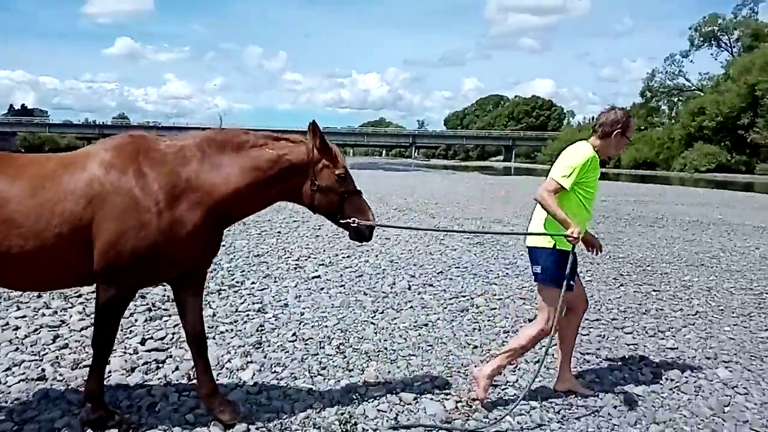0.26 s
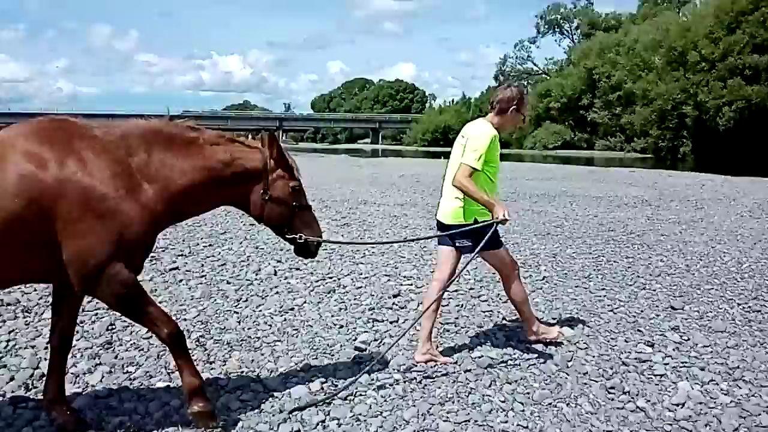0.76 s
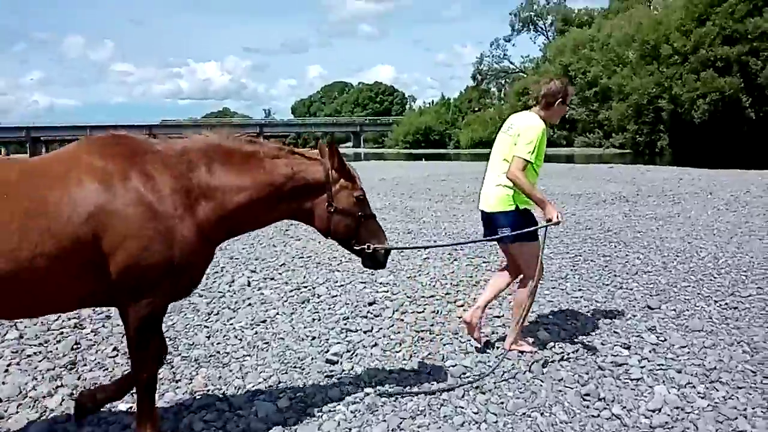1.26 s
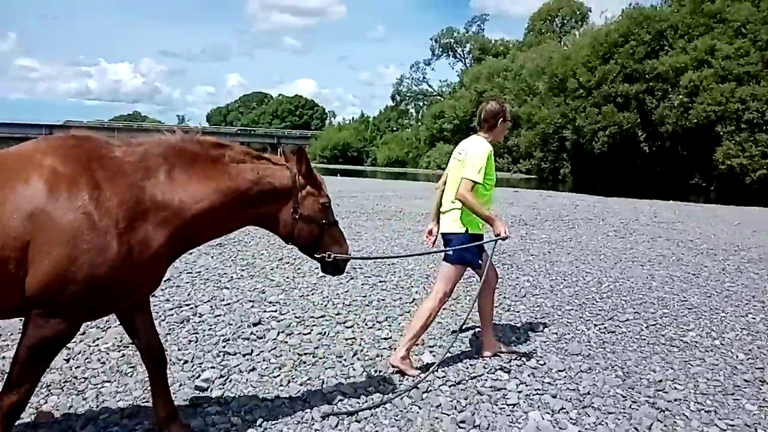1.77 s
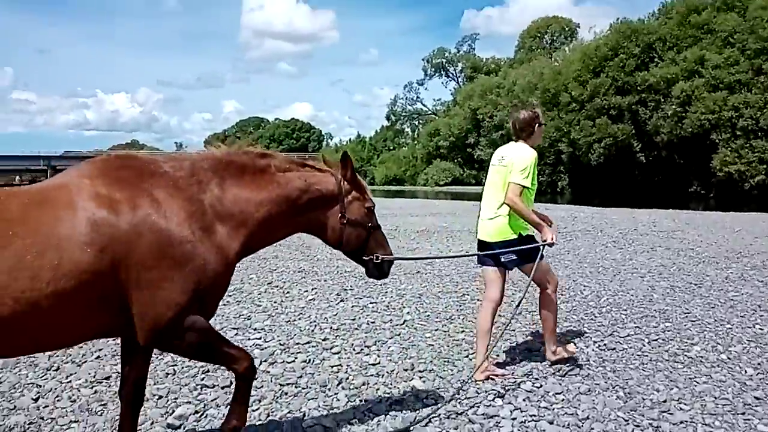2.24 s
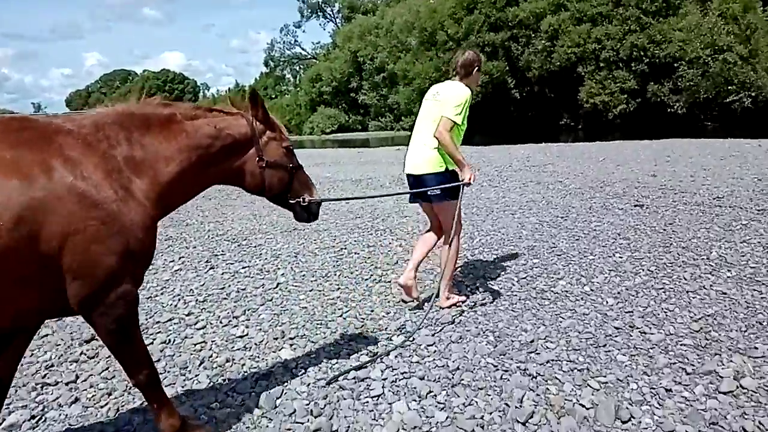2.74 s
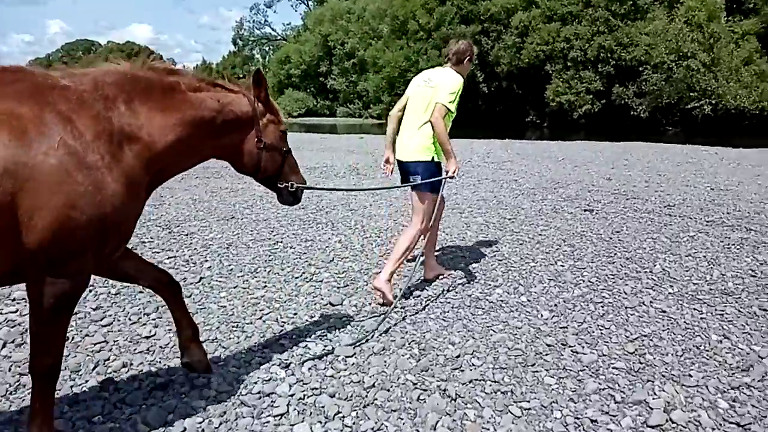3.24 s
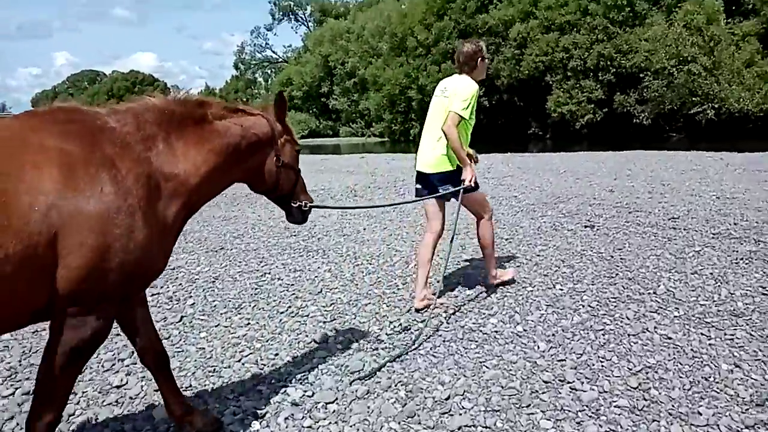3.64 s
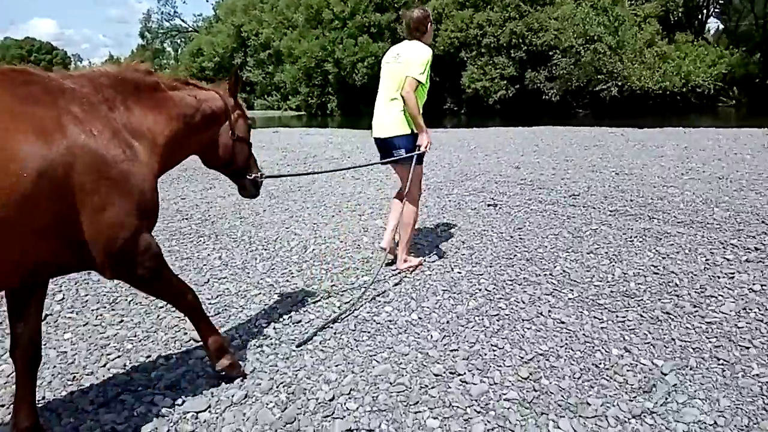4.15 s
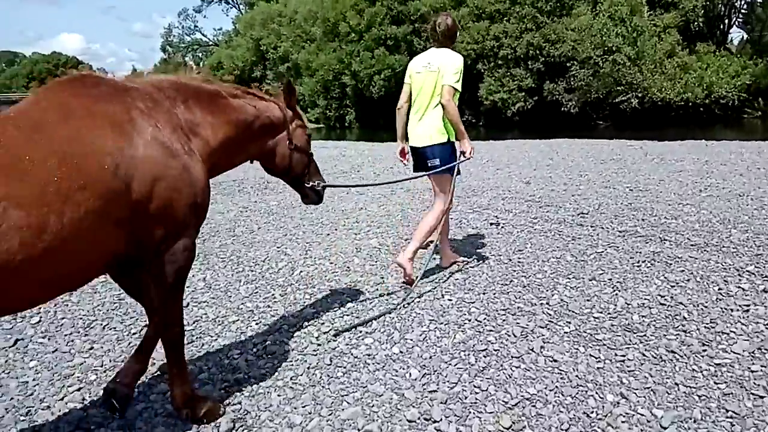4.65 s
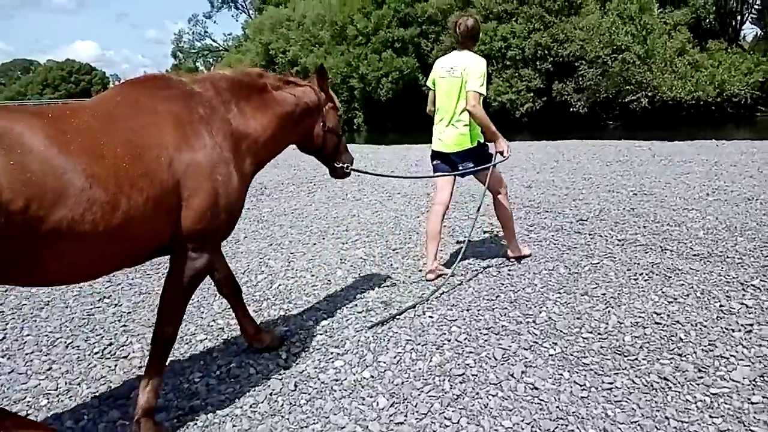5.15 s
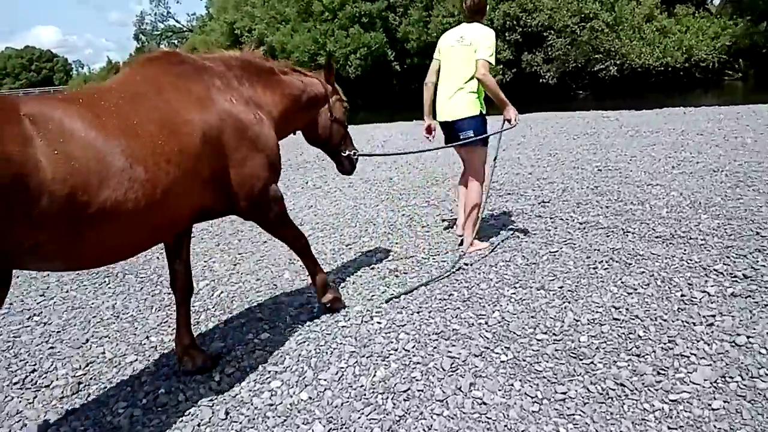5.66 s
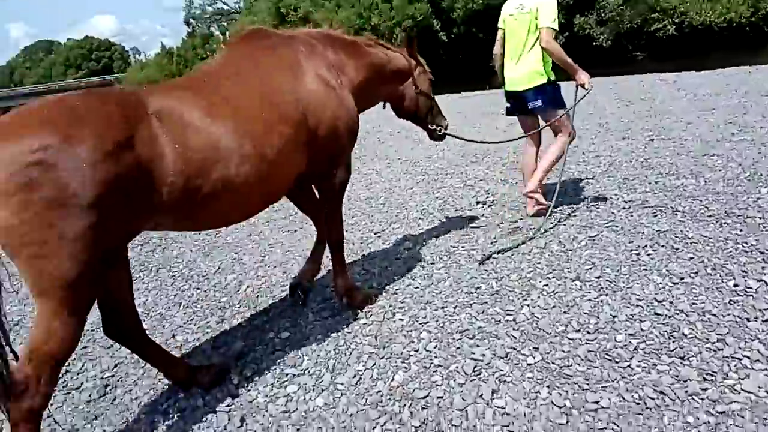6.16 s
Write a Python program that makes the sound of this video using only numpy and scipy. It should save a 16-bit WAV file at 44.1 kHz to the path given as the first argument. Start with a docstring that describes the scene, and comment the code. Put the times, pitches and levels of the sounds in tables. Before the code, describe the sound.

Hooves and bare feet crunch and clack over loose river stones close by, with dull thuds, a faint engine drone and soft distant rush.

```python
"""Stones knock and crunch at once, close by: a horse and a barefoot walker cross a dry bed of river stones.
Knocks and crunches are many short damped rings, and dull low swings make the thuds of landing weight.
Behind them a far engine drones as wavering sine tones, and filtered noise makes a soft far rush.
A light wind pops, mostly on the left port of a hand-held phone; its two ports differ in colour and distance."""
import sys
import numpy as np
from scipy import signal
from scipy.fft import rfft, irfft, next_fast_len
from scipy.io import wavfile
from scipy.ndimage import map_coordinates

SR = 44100
rng = np.random.default_rng(int(sys.argv[2]) if len(sys.argv) > 2 else 0)


def store_wav(level_fs):
    """Save 16-bit WAV to argv[1]."""
    pcm = np.round(np.clip(np.atleast_2d(level_fs), -1, 1) * 32767)
    wavfile.write(sys.argv[1], SR, pcm.T.astype(np.int16))


N = 282240  # samples, 6.4 s


def amp(db):
    """Turn decibels into a gain."""
    return 10 ** (np.asarray(db) / 20)


def unit(x):
    """Scale a sound to an rms of 1."""
    return x / np.sqrt(np.mean(x ** 2) + 1e-20)


def along(points, hz):
    """Read a curve of (Hz, value) points, with straight lines on a log frequency axis."""
    point_hz, value = np.transpose(points)
    return np.interp(np.log(hz + 1), np.log(point_hz + 1), value)


def curves(rows):
    """Give one value per sample for each column after the time."""
    s, *columns = np.transpose(rows)
    return [np.interp(np.arange(N) / SR, s, column) for column in columns]


def wobble(knots_per_s):
    """Draw a smooth random curve through random knots."""
    knots = rng.standard_normal(int(N * knots_per_s / SR) + 4)
    return map_coordinates(knots, [np.arange(N) * knots_per_s / SR])


def filtered(x, response):
    """Multiply the spectrum of a sound by a response that depends on frequency."""
    size = next_fast_len(N + SR // 4)
    spectrum = rfft(x, size) * response(np.fft.rfftfreq(size, 1 / SR))
    return irfft(spectrum, size)[..., :N]


# How much sooner a step reaches the left port, by where it falls: start_s [s], lead_ms [ms]
LEFT_LEAD = [(0, 0.6), (.08, 0.85), (.2, 0.87), (.4, 0.73), (.65, 0.7), (.88, 0.79), (1, 0.73), (1.3, 0.74),
             (1.59, 0.78), (1.83, 0.67), (2.14, 0.71), (2.5, 0.83), (2.75, 0.7), (3, 0.63), (3.06, 0.78),
             (3.65, 0.74), (3.7, 0.77), (3.95, 0.58), (4.18, 0.82), (4.48, 0.68), (4.55, .82), (4.7, 0.6),
             (4.97, 0.88), (5.13, 0.78), (5.4, 0.65), (5.71, 0.85), (6.16, 0.72), (6.4, 0.78)]


def contacts(s, gain, hz, spread, cycles, scatter_s, size):
    """Ring each contact as a short damped sine; each lies elsewhere, so its lead between the ports differs."""
    draw = rng.standard_normal((len(s), 3))
    pitch = np.clip(hz * np.exp(spread * draw[:, 0]), 90, 17000)[:, None]
    lead_s = np.interp(s, *np.transpose(LEFT_LEAD)) / 1000 + scatter_s * draw[:, 1]
    signed_gain = (gain * np.sign(draw[:, 2]))[:, None]
    # each ring fades smoothly to nothing by the end of its window
    rest = np.cos(np.arange(size) / size * np.pi / 2)
    out = np.zeros((2, N))
    for side, start_s in enumerate((s - lead_s / 2, s + lead_s / 2)):
        at = np.ceil(start_s * SR)[:, None] + np.arange(size)
        turns = (at / SR - start_s[:, None]) * pitch
        rise = 1 - np.exp(-turns / 0.33)  # rounded stones press in over part of a cycle
        decay = np.exp(-turns / cycles)
        ring = signed_gain * np.sin(2 * np.pi * turns) * decay * rise * rest
        # samples past the end collect in a spare last place; those before the start pile onto the first sample
        place = np.clip(at, 0, N).astype(int)
        out[side] = np.bincount(place.ravel(), ring.ravel(), N + 1)[:N]
    return out


# A foot or hoof presses the pebbles, short crunches over longer rolls:
# start_s [s], length_s [s], small_level_db (small pebbles) [dB], big_level_db (big stones) [dB]
CRUNCH_TABLE = [(0, 0.025, -32.5, -50), (0.024, 0.076, -47, -50), (0.065, 0.064, -44, -34),
                (0.133, 0.44, -52.5, -49.5), (0.188, 0.046, -59, -39), (0.343, 0.062, -50, -46.5),
                (0.454, 0.008, -44, -50), (0.543, 0.073, -45, -48), (0.577, 0.031, -42.5, -35.5),
                (0.611, 0.13, -53.5, -50), (0.666, 0.048, -46.5, -42.5), (0.725, 0.067, -60, -58),
                (0.823, 0.23, -54, -50.5), (0.872, 0.016, -37, -35.5), (0.966, 0.18, -43.5, -40),
                (1.138, 0.26, -49, -47.5), (1.209, 0.06, -42.5, -59), (1.273, 0.025, -38.5, -45),
                (1.293, 0.026, -40.5, -39), (1.417, 0.2, -57.5, -55.5), (1.576, 0.039, -40.5, -44),
                (1.626, 0.098, -53, -49.5), (1.738, 0.2, -54.5, -47), (1.816, 0.039, -44.5, -42),
                (1.978, 0.047, -52, -43.5), (2.033, 0.014, -34, -34.5), (2.054, 0.042, -48.5, -45),
                (2.131, 0.018, -46, -41.5), (2.149, 0.052, -54.5, -53), (2.353, 0.023, -50.5, -44.5),
                (2.49, 0.011, -46, -39.5), (2.591, 0.023, -47.5, -45.5), (2.689, 0.17, -57.5, -52.5),
                (2.775, 0.016, -45, -33), (2.872, 0.16, -42.5, -40.5), (2.96, 0.074, -47.5, -48),
                (3.04, 0.1, -54, -52), (3.058, 0.018, -36.5, -35.5), (3.123, 0.013, -41, -41.5),
                (3.149, 0.045, -49.5, -67), (3.366, 0.013, -36, -31.5), (3.394, 0.14, -60.5, -54.5),
                (3.587, 0.22, -45, -44.5), (3.6, 0.025, -42, -40), (3.627, 0.086, -36, -34),
                (3.735, 0.02, -57, -43), (3.796, 0.12, -54.5, -52.5), (3.92, 0.1, -47.5, -46.5),
                (4.07, 0.015, -37, -43.5), (4.09, 0.071, -54, -54), (4.108, .02, -44.5, -60),
                (4.171, 0.021, -33, -33.5), (4.196, 0.025, -44, -52), (4.221, 0.048, -49.5, -54),
                (4.276, 0.19, -47.5, -44), (4.471, 0.023, -37, -33), (4.509, 0.33, -50.5, -51),
                (4.526, 0.049, -35, -33), (4.594, 0.011, -46, -48), (4.646, 0.12, -54.5, -46.5),
                (4.959, 0.023, -43, -45), (4.987, 0.31, -57, -50.5), (5.022, 0.072, -43.5, -45),
                (5.108, 0.046, -42.5, -36), (5.162, 0.17, -46.5, -49), (5.346, 0.11, -48.5, -45.5),
                (5.457, 0.12, -61, -59), (5.69, 0.053, -41.5, -45), (5.726, 0.59, -51.5, -51.5),
                (5.825, 0.056, -46, -43), (5.919, 0.027, -41.5, -41.5), (6.009, 0.036, -46, -55),
                (6.093, 0.02, -49.5, -42.5), (6.153, 0.061, -49.5, -46), (6.271, 0.12, -61, -65.5)]
PRESS_S, LIFT_S = 0.0012, 0.022  # rise in power; time to fall 60 dB after the load
SAG_DB = 2  # loss while the load lasts
SWELL_DB, SWELL_S = 0.5, 0.014  # a crunch starts this much softer and swells in this time


def load():
    """Press, sag and let go for each crunch, adding in power; gives the gains of small and big stones."""
    t = np.arange(N) / SR
    power = np.zeros((2, N))
    for s, length, *level_db in CRUNCH_TABLE:
        first = np.searchsorted(t, s)
        age = t[first:][:int((length + LIFT_S) * SR)] - s
        swell_db = -SWELL_DB * np.maximum(1 - age / SWELL_S, 0)
        sag_db = -SAG_DB * np.minimum(age / length, 1) ** 2
        lift_db = -60 * np.maximum(age - length, 0) / LIFT_S
        gain = amp(np.add.outer(level_db, swell_db + sag_db + lift_db))
        press = np.minimum(age / PRESS_S, 1)
        power[:, first:first + len(age)] += gain ** 2 * press
    return np.sqrt(power)


def stream(per_s, spiky_db, lumpy_db, hz, **stone):
    """Rain contacts at random, with levels that wander in clumps, scaled to rms 1."""
    draw = rng.random((int(per_s * N / SR), 2))
    at = (draw[:, 0] * N).astype(int)
    clumps_db = lumpy_db * (wobble(60) + 0.2 * wobble(170))
    spikes_db = np.minimum(-spiky_db * np.log(1 - draw[:, 1]), 16)
    gain = amp(spikes_db + clumps_db[at])
    return unit(contacts(draw[:, 0] * N / SR, gain, hz[at], **stone))


# How the stone bed changes along the way:
# start_s [s], small_pitch_hz [Hz], big_pitch_hz [Hz], rumble_db (relative to the load on big stones) [dB]
BED_TABLE = [(0, 6000, 1565, -20), (.7, 5000, 1410, -16), (1.1, 4580, 1430, -22), (1.5, 4500, 1290, -11),
             (2, 5270, 1344, -16), (2.6, 5880, 1270, -6), (3.2, 5950, 1320, -21), (3.65, 5460, 1195, -5.5),
             (4.1, 6500, 1500, -8), (4.5, 5730, 1356, -9), (5.2, 5840, 1207, -5.5), (6.4, 6400, 1190, -3.5)]
SMALL_DRIFT, BIG_DRIFT = 0.17, 0.1  # pebble pitches drift as the load meets other stones (log pitch)
SETTLE_SMALL_DB, SETTLE_BIG_DB, SETTLE_BED_DB = -65.5, -60.5, -59.5  # settling between the steps
STRAY_DB = -68  # single pebbles tipping over at random


def grind():
    """Roll and settle pebbles while a foot or hoof loads them; the bed rumbles under the weight."""
    on_small, on_big = load()
    small_hz, big_hz, rumble_db = curves(BED_TABLE)
    small_hz = small_hz * np.exp(SMALL_DRIFT * wobble(15))
    big_hz = big_hz * np.exp(BIG_DRIFT * wobble(15))
    middle_hz = np.sqrt(small_hz * big_hz)

    small = stream(3500, spiky_db=1.0, lumpy_db=2, hz=small_hz,
                   spread=0.46, cycles=1.07, scatter_s=.000045, size=52)
    big = stream(1600, spiky_db=2.0, lumpy_db=2.5, hz=big_hz,
                 spread=0.4785, cycles=6.2, scatter_s=0.000085, size=300)
    # a few loose stones of middle size ring on for several cycles
    loose = stream(260, spiky_db=7.0, lumpy_db=2.0, hz=middle_hz,
                   spread=0.51, cycles=34, scatter_s=.00006, size=340)
    bed = stream(300, spiky_db=2.0, lumpy_db=-1.0, hz=np.full(N, 215.),
                 spread=0.46, cycles=2.4, scatter_s=0.0001, size=800)
    stray = stream(45, spiky_db=-0.5, lumpy_db=-4.5, hz=small_hz,
                   spread=0.305, cycles=5.3, scatter_s=.00006, size=120)

    # load and settling add in power
    small_gain = np.hypot(on_small, amp(SETTLE_SMALL_DB))
    big_gain = np.hypot(on_big, amp(SETTLE_BIG_DB))
    bed_gain = np.hypot(amp(rumble_db) * on_big, amp(SETTLE_BED_DB))
    pebbles = small_gain * (small + amp(-7.0) * loose)
    return amp(STRAY_DB) * stray + pebbles + big_gain * big + bed_gain * bed


# Tone of the rush of river and distance: pitch_hz [Hz], level_db (relative, per Hz) [dB]
AIR_TONE = [(15, -50), (25, 20.5), (97, -2), (293, -18), (476, -5.5), (1020, -3), (3250, -10), (9070, -28),
            (12500, -52), (14800, -41), (16000, -33)]
AIR_DB = -56  # middle of a slightly wandering level


def air():
    """Filter noise into a diffuse far rush, alike at both ports only in the bass."""
    common, left, right = rng.standard_normal((3, N))

    def alike(hz):
        """Give the share of power common to both ports, falling as waves get shorter."""
        return 1 / (1 + (hz / 350) ** 2)

    shared = filtered(common, lambda hz: amp(along(AIR_TONE, hz)) * np.sqrt(alike(hz)))
    own = filtered(np.array([left, right]), lambda hz: amp(along(AIR_TONE, hz)) * np.sqrt(1 - alike(hz)))
    return amp(AIR_DB + 0.33 * wobble(2.96)) * unit(shared + own)


# Far engine, nearing: start_s [s], pitch_hz (firing rate before wavering) [Hz], level_db (before a lift) [dB]
ENGINE_TABLE = [(0, 92.3, -82), (.7, 93.1, -70), (1.5, 95.4, -64), (2.2, 97.2, -71), (2.7, 98.2, -68),
                (3.2, 98.8, -65), (3.9, 99.4, -65), (4.3, 100.1, -61.5), (5, 100.7, -58.5),
                (6.4, 102.9, -59.5)]
# Engine tones: multiple (of the firing rate) [times], level_db (before wavering) [dB]
EXHAUST_TONES = [(1, 2), (2, -2), (3, -17)]


def engine():
    """Add sine tones at multiples of the firing rate, wavering over the distance."""
    hz, level_db = curves(ENGINE_TABLE)
    phase = 2 * np.pi * np.cumsum(hz * (1 + 0.00397 * wobble(6))) / SR
    tones = sum(amp(tone_db + 1.5 * wobble(15)) * np.sin(multiple * phase)
                for multiple, tone_db in EXHAUST_TONES)
    return amp(level_db + 4) * tones


def burst(rows, t60, boost_db, per_s, loose_db, count):
    """Turn each blow into a first hit and a dying rattle; gives times, gains and pitches of the contacts."""
    s, level_db, hz = np.transpose(rows)[..., None]
    draw = rng.exponential(size=(len(rows), 2, count))
    after_s = (np.cumsum(draw[:, 0], axis=1) - draw[:, 0, :1]) / per_s
    fade_db = -60 * after_s / t60
    weaker_db = -loose_db * draw[:, 1] * (after_s > 0)  # the first hit keeps its full level
    gain = amp(level_db + boost_db + fade_db + weaker_db)
    return (s + after_s).ravel(), gain.ravel(), np.repeat(hz, count)


# Small stones clacking: start_s [s], level_db (before each layer's trim) [dB], pitch_hz (centre) [Hz]
SMALL_KNOCKS = [(0.0104, -18, 6600), (0.021, -24, 6000), (0.073, -20, 3120), (0.0765, -21.5, 5800),
                (0.189, -36, 3340), (0.201, -27, 5660), (0.2235, -28, 3380), (0.2483, -37, 4870),
                (0.2688, -25, 7900), (0.2937, -29, 3330), (0.3461, -39, 5600), (0.4, -37, 5520),
                (0.453, -33.5, 9160), (0.5382, -26.5, 7380), (0.5926, -25, 6200), (0.6439, -44, 6990),
                (0.6976, -29.5, 5100), (0.7328, -36, 8850), (0.8494, -34, 6200), (0.8724, -14, 4900),
                (0.9493, -34, 3000), (0.9746, -32, 2960), (1.0995, -27.5, 2900), (1.1712, -32, 5350),
                (1.1954, -25.5, 5040), (1.2196, -26, 2980), (1.232, -32, 2630), (1.24, -39, 8900),
                (1.276, -28, 2920), (1.29, -19.5, 2980), (1.3663, -29, 3140), (1.395, -38, 6800),
                (1.494, -38, 4500), (1.5853, -24.5, 3480), (1.594, -22, 4600), (1.6591, -36, 2700),
                (1.7469, -33.5, 5600), (1.7873, -36, 4740), (1.8254, -31, 4600), (1.853, -36, 4500),
                (1.8861, -34, 5160), (1.914, -32.5, 4770), (1.9535, -40, 7500), (1.9814, -30, 3100),
                (2.0369, -24, 4680), (2.0737, -31, 3750), (2.132, -25.5, 4800), (2.161, -39, 4660),
                (2.2458, -32, 9400), (2.2722, -40, 8000), (2.284, -38, 7500), (2.4345, -40, 5020),
                (2.4966, -21.5, 4670), (2.497, -23.5, 8500), (2.5521, -38.5, 6920), (2.5825, -40, 4800),
                (2.6, -33, 4740), (2.7112, -35, 4760), (2.7606, -36, 8800), (2.7852, -25, 4900),
                (2.839, -30, 3450), (2.8724, -24, 6130), (2.9083, -41, 5250), (2.9607, -25.5, 5740),
                (2.992, -27, 4920), (3.0582, -25, 4860), (3.129, -24.5, 5900), (3.1672, -40, 9300),
                (3.2705, -37.5, 8700), (3.3655, -27.5, 9500), (3.376, -31, 5200), (3.4048, -26.5, 5360),
                (3.4615, -35, 4900), (3.4865, -42, 6070), (3.5698, -43, 5430), (3.5942, -35, 3880),
                (3.6137, -36, 9360), (3.6348, -26, 5250), (3.6496, -19, 5900), (3.67, -20.5, 6470),
                (3.692, -14.5, 4630), (3.696, -20.5, 6420), (3.722, -30, 8000), (3.7435, -28.5, 2800),
                (3.8871, -40, 4070), (3.9255, -36, 9200), (4.0702, -17.5, 9330), (4.0706, -17.5, 5080),
                (4.0748, -19, 9200), (4.0795, -23, 4900), (4.088, -32, 9000), (4.113, -31, 9000),
                (4.1175, -30, 9100), (4.124, -33, 9100), (4.1728, -18, 8300), (4.182, -35, 9400),
                (4.193, -27, 5000), (4.2926, -41, 9300), (4.3595, -31.5, 4070), (4.4166, -30.5, 6600),
                (4.476, -22, 5070), (4.481, -17.5, 5140), (4.5301, -35, 9400), (4.54, -20.5, 4810),
                (4.551, -22.5, 5070), (4.597, -27.5, 6200), (4.6249, -42, 6540), (4.6563, -31, 5700),
                (4.669, -23.5, 5500), (4.7087, -42, 6440), (4.739, -30, 5000), (4.746, -30, 5000),
                (4.7965, -40, 9750), (4.9591, -26, 4580), (4.975, -34, 6000), (5.031, -28.5, 6150),
                (5.083, -31, 2880), (5.1138, -24.5, 2760), (5.135, -24, 8860), (5.144, -22.5, 8940),
                (5.184, -34, 5050), (5.216, -31, 5000), (5.226, -33, 6990), (5.2457, -26.5, 7160),
                (5.305, -34, 5200), (5.3528, -31.5, 6900), (5.37, -35, 5030), (5.4236, -29.5, 4700),
                (5.443, -30, 7400), (5.4959, -40, 9340), (5.5098, -32.5, 6840), (5.6901, -23.5, 5120),
                (5.729, -24, 7430), (5.764, -30.5, 4700), (5.855, -31, 4400), (5.9194, -35, 2800),
                (5.9808, -35, 4860), (5.9893, -41, 5160), (6.005, -29.5, 6800), (6.023, -32, 9000),
                (6.147, -24.5, 5540), (6.15, -19.5, 5380), (6.1545, -21.5, 5300), (6.166, -24, 5200),
                (6.172, -25, 5000), (6.25, -42, 9000), (6.314, -33, 7560), (6.32, -30.5, 8600),
                (6.3517, -27.5, 5630), (6.3595, -27.5, 9800), (6.369, -38, 5000), (6.379, -43, 9500)]
# Big stones knocking: start_s [s], level_db (before a trim) [dB], pitch_hz (centre) [Hz]
BIG_KNOCKS = [(0.073, -19.5, 2270), (0.108, -31, 980), (0.189, -27, 1550), (0.496, -32, 1460),
              (0.582, -27.5, 1380), (0.666, -30, 1930), (0.854, -26.5, 2260), (0.973, -24.5, 2530),
              (0.98, -34, 1310), (1.01, -37, 1000), (1.035, -37, 1500), (1.064, -28, 1400),
              (1.082, -32, 1100), (1.104, -32, 1210), (1.194, -30, 916), (1.225, -38, 1000),
              (1.294, -28, 1800), (1.593, -26, 896), (1.831, -24, 884), (1.833, -28.5, 1830),
              (1.912, -31, 1900), (1.981, -35, 1820), (2.038, -28.5, 1150), (2.134, -22, 1720),
              (2.488, -31, 994), (2.498, -34, 706), (2.44, -39, 1707), (2.518, -44, 1100),
              (2.535, -41, 1500), (2.642, -38, 1810), (2.702, -31.5, 1820), (2.777, -25.5, 1167),
              (2.839, -30.5, 1840), (2.887, -36, 1680), (2.909, -20.5, 1120), (2.935, -33, 1300),
              (2.962, -28.5, 1670), (2.967, -23.5, 1105), (2.995, -31.5, 1400), (3.059, -22, 788),
              (3.066, -28, 1480), (3.126, -36, 970), (3.13, -28.5, 2060), (3.365, -26, 1340),
              (3.375, -29, 1210), (3.405, -36, 980), (3.421, -32.5, 1370), (3.46, -33.5, 1390),
              (3.592, -32.5, 930), (3.633, -26, 830), (3.658, -37, 1410), (3.672, -31, 1000),
              (3.69, -25, 1460), (3.7, -27, 740), (3.727, -30, 1610), (3.779, -30, 2030),
              (4.0795, -25.5, 2100), (4.177, -23, 1480), (4.177, -28, 800), (4.348, -33, 1440),
              (4.476, -24, 2250), (4.541, -24, 820), (4.556, -25, 960), (4.565, -22, 1200),
              (4.596, -33.5, 1040), (4.708, -34, 1630), (4.827, -29, 1560), (4.957, -29, 1044),
              (5.023, -32.5, 980), (5.055, -35, 1190), (5.11, -21.5, 1620), (5.12, -24, 1300),
              (5.145, -31, 1410), (5.185, -33.5, 1300), (5.282, -30, 2120), (5.083, -38, 1000),
              (5.355, -35.5, 1090), (5.783, -37, 950), (5.854, -29, 967), (5.866, -32, 1190),
              (5.93, -35, 1000), (6.097, -37, 1380), (6.106, -35, 800), (6.147, -31.5, 865),
              (6.168, -33, 1410)]
CLACK_DIES_S, CLUNK_DIES_S = 0.027, 0.019  # a rattle falls 60 dB in this time


def knocks():
    """Clack small stones over a wide range and ring them near their own pitch; big ones ring lower."""
    clack_hits = burst(SMALL_KNOCKS, CLACK_DIES_S, 0.44, 4000, 4.4, count=36)
    clack = contacts(*clack_hits, spread=0.4, cycles=1.55, scatter_s=.000045, size=48)
    chime_hits = burst(SMALL_KNOCKS, CLACK_DIES_S, -7.5, 493.0, 3.8, count=5)
    chime = contacts(*chime_hits, spread=0.023, cycles=13.3, scatter_s=.00004, size=260)
    clunk_hits = burst(BIG_KNOCKS, CLUNK_DIES_S, 0.68, 457.0, 1.5, count=8)
    clunk = contacts(*clunk_hits, spread=0.091, cycles=3.93, scatter_s=.00005, size=500)
    return clack + chime + clunk


def ground(x):
    """Scatter every contact off the rough bed into a brief noise tail, unlike at each port."""
    t = np.arange(SR // 10) / SR
    tail = rng.standard_normal((2, len(t))) * amp(-60 * t / 0.096)  # falls 60 dB in 0.096 s
    tail = tail / np.linalg.norm(tail[0])
    return signal.fftconvolve(x.mean(0)[None], tail, axes=1)[:, :N]


# Hooves and heels landing: start_s [s], level_db (before a lift) [dB], pitch_hz (centre) [Hz]
THUD_TABLE = [(0.191, -40.5, 216), (0.575, -38, 300), (0.872, -38.5, 210), (1.585, -38.5, 259),
              (1.594, -36, 270), (1.751, -38, 280), (2.489, -36.5, 303), (2.495, -29.5, 235),
              (2.502, -33, 258), (2.555, -38, 197), (2.771, -46, 254), (2.909, -33.5, 334),
              (2.96, -36.5, 295), (3.057, -36.5, 168), (3.367, -36.5, 238), (3.408, -33, 235),
              (3.605, -35.5, 330), (3.634, -35, 260), (3.648, -30, 197), (3.662, -34, 300),
              (3.673, -33, 231), (3.688, -26, 227), (3.695, -31, 153), (3.7, -31, 350), (3.736, -39, 226),
              (3.747, -37, 335), (3.92, -40.5, 189), (4.176, -45, 150), (4.179, -36.5, 320),
              (4.279, -41.5, 221), (4.31, -44, 180), (4.351, -40, 230), (4.393, -41, 280),
              (4.482, -34, 420), (4.488, -33, 182), (4.528, -33, 151), (4.555, -34, 390), (5.05, -40, 160),
              (5.095, -43, 172), (5.851, -38.5, 164), (5.921, -41, 190), (6.098, -38, 198)]


def thuds():
    """Land weight on the bed as one dull swing or two."""
    s, level_db, hz = np.transpose(THUD_TABLE)
    return contacts(s, amp(level_db + 5.5), hz, spread=0.026, cycles=1.44, scatter_s=.00004, size=1600)


# Wind pops on the left port: start_s [s], level_db (before a lift) [dB], pitch_hz (centre) [Hz]
PUFF_TABLE = [(1.621, -33, 109), (1.651, -30, 200), (1.69, -39, 120), (1.719, -26.5, 330),
              (1.723, -25, 140), (1.857, -27.5, 128), (1.888, -32, 250)]


def puffs():
    """Swing the left membrane once, slackly, for each pop of wind; the right port gets a little of it."""
    s, level_db, hz = np.transpose(PUFF_TABLE)
    pops = contacts(s, amp(level_db + 11.0), hz, spread=0.018, cycles=0.36, scatter_s=0, size=1200)
    return pops * [[1], [.15]]


def scene():
    """Add the steps, their scatter off the ground and the background."""
    steps = knocks() + grind() + thuds()
    return steps + amp(-10.0) * ground(steps) + engine() + puffs() + air()


# The hand shades the left port as the phone turns: start_s [s], share (of the shaded band) [0-1]
HAND_SHADOW = [(0, 0.2), (1.6, 0.27), (4, 0.39), (6.4, 0.4)]
# Colour of the left microphone port: pitch_hz [Hz], level_db [dB]
LEFT_COLOUR = [(25, -63), (60, -9), (110, -2.5), (280, -2.5), (450, -4), (620, -2.5), (800, 3),
               (1050, -1.5), (1450, -1.5), (2000, 4), (2700, 0), (3800, 1), (5300, 4), (7800, 4),
               (10000, -6.5), (13800, -12), (15000, 4), (16000, -31)]
# Colour of the right microphone port: pitch_hz [Hz], level_db [dB]
RIGHT_COLOUR = [(25, -36), (60, -4.5), (110, -1), (280, -1), (450, -4.5), (620, -1), (800, 2.5), (1050, -5),
                (1450, -4.5), (2000, 0), (2700, 0), (3800, -0.03), (6500, 4), (8000, 2), (9200, 12.5),
                (11000, 5.5), (13500, 1.5), (15000, 15), (16000, -20)]
TOP_HZ = 16600  # nothing is kept from here up


def record(dry):
    """Take a band around 3000 Hz from the left port by hand, then colour each port and cut the top."""
    shaded = filtered(dry[0], lambda hz: np.exp(-(np.log(hz / 3000 + 1e-9) / 0.48) ** 2))
    share = np.clip(curves(HAND_SHADOW)[0], 0, 1)
    heard = np.array([dry[0] - share * shaded, dry[1]])

    def ports(hz):
        """Give the gain of each port at each frequency."""
        return amp([along(LEFT_COLOUR, hz), along(RIGHT_COLOUR, hz)]) * (hz < TOP_HZ)

    return filtered(heard, ports)


dry = scene()
out = record(dry)
store_wav(out)
```